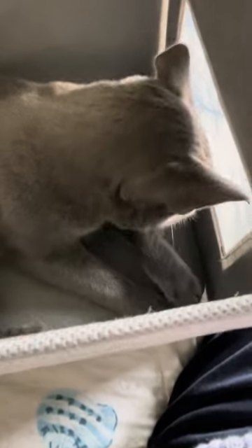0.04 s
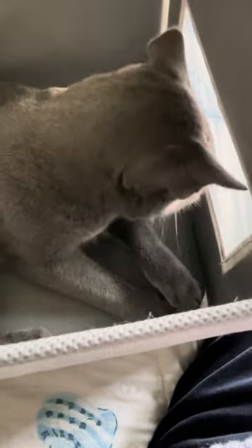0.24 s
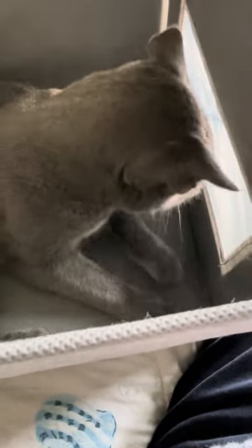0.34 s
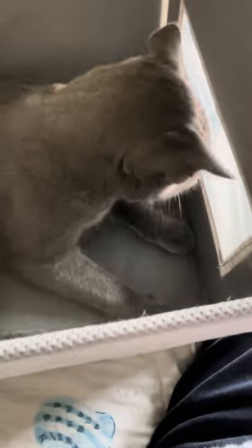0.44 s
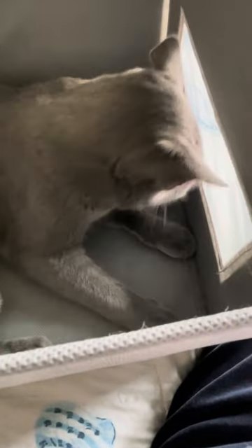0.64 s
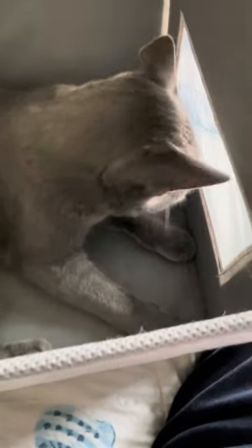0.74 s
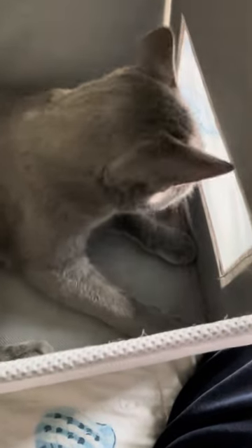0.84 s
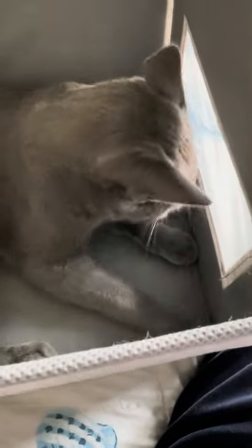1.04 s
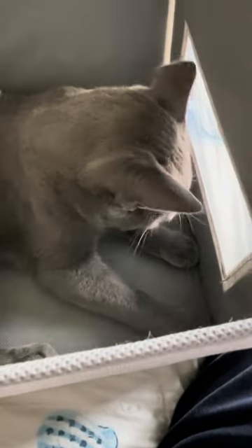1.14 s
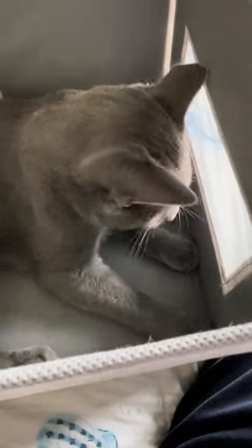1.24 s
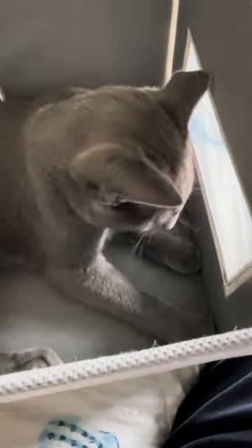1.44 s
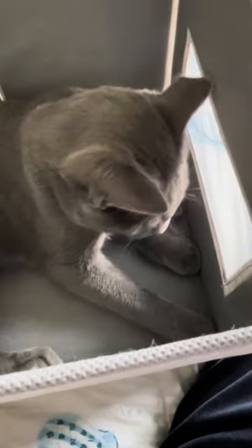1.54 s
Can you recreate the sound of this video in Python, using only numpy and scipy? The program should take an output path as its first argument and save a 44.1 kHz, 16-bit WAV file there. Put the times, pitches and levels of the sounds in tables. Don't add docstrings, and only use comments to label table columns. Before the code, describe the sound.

One dull boxy paw thump on card, followed by light claw ticks and faint brushing

```python
import sys
import numpy as np
from scipy import signal
from scipy.fft import rfft, irfft
from scipy.io import wavfile
from scipy.ndimage import uniform_filter1d

SR = 44100
rng = np.random.default_rng(int(sys.argv[2]) if len(sys.argv) > 2 else 0)


def store_wav(level_fs):
    pcm = np.round(np.clip(np.atleast_2d(level_fs), -1, 1) * 32767)
    wavfile.write(sys.argv[1], SR, pcm.T.astype(np.int16))


def boost(x):
    u = np.asarray(x, float) / 20
    return 10 ** u


N = 70560
HZ = np.fft.rfftfreq(N, 1 / SR)
TIME = np.arange(N) / SR
TICK_LAG = .6


def evened(x):
    return x / np.sqrt(np.mean(x ** 2) + 1e-20)


def read(points, hz):
    f, value = np.transpose(points)
    return np.interp(np.log(hz + 1), np.log(f + 1), value)


def bump(hz, width):
    return np.exp(-((HZ - hz) / (width / 1.23)) ** 2)


def resonances(table):
    return sum(boost(db) * bump(hz, width) for hz, width, db in table)


def coloured(x, gain):
    return irfft(rfft(x) * gain, N)


def noise():
    return rng.standard_normal(N)


def impulse(s):
    return 1. * (np.arange(N) == round(s * SR))


def swell(s, spread):
    return np.exp(-.5 * ((TIME - s) / spread) ** 2)


def sliding(from_hz, to_hz, db, s, spread):
    hz = np.interp(TIME, [s - spread * 1.5, s + spread], [from_hz, to_hz])
    waver = 1 + .4 * evened(uniform_filter1d(noise(), 500))
    return boost(db) * waver * np.sin(2 * np.pi * np.cumsum(hz) / SR) * swell(s, spread)


def bending(x, share=1):
    lag_s = share * .0235 * (np.maximum(HZ, 85) / 100) ** -.95
    return coloured(x, np.exp(-2j * np.pi * np.cumsum(lag_s) * SR / N))


def dull_top():
    return boost(-14 * (HZ > 13200))


def pair(mid, side):
    mid = coloured(mid, dull_top() * boost(-14 * bump(7600, 1300)))
    side = coloured(side, boost(-10 * bump(11000, 1500) - 8 * bump(5300, 400)))
    return np.array([mid + side, mid - side])


# f/Hz, width/Hz, level/dB
HUM_TONES = [
    (58.76, 13, -59),
    (118.8, 9.1, -64),
]


def hum():
    return sum(boost(db) * evened(coloured(noise(), bump(hz, width))) for hz, width, db in HUM_TONES)


def whine():
    return sliding(1548, 1548, -85, .08, .03)


# f/Hz, level/dB per Hz
AIR_MID_TONE = [(12, -48), (20, -1.5), (113, 5.5), (310, -24.5), (499, -34), (2200, -38.5), (2990, -44.5),
                (3340, -39.5), (16000, -51.5)]
# f/Hz, level/dB per Hz
AIR_SIDE_TONE = [(12, -9), (20, -13.5), (168, -0.5), (527, -14.5), (1060, -16), (1570, -23.5),
                 (5230, -30.5), (7110, -35), (16000, -46)]
# t/s, level/dB
RUMBLE_SWELL = [(0, -4), (.045, -3.5), (.095, -5.5), (.2, 1.5), (.45, 4.5), (.72, -2), (.755, -10),
                (.8, -2.5), (1, -2), (1.27, 4.5), (1.31, -18.5), (1.35, -2), (1.585, 1.5), (1.6, 4)]


def air():
    mid = boost(-61.5) * evened(coloured(noise(), boost(read(AIR_MID_TONE, HZ))))
    side = boost(-74.5) * evened(coloured(noise(), boost(read(AIR_SIDE_TONE, HZ))))
    low = coloured(mid, bump(0, 300))
    rumble = (low + hum()) * boost(np.interp(TIME, *np.transpose(RUMBLE_SWELL)))
    return pair(mid - low + rumble + whine(), side)


# f/Hz, level/dB, t/s, spread/s
WALL_PINGS = [(4550, -59, 1.063, .0009), (2300, -66, .2335, .0005), (660, -60, 1.528, .002),
              (560, -62, 1.545, .002), (1300, -68, 1.315, .0005), (2200, -50, .252, .0006),
              (1700, -52, .248, .0007), (215, -46.5, 1.3893, .005), (215, -41, .308, .009),
              (2200, -65, 1.528, .0008), (2400, -68, 1.479, .0006), (2350, -60, 1.326, .0008),
              (620, -66, 1.097, .004), (330, -56, 1.09, .005), (1150, -67, 1.13, .001),
              (1100, -68, 1.085, .0006), (1000, -66, 1.545, .001), (400, -62, 1.088, .003),
              (680, -61, 1.066, .002), (2200, -72, .786, .001), (2050, -74, .767, .001),
              (450, -63, 1.1, .003), (820, -66, 1.533, .0015), (400, -64, 1.56, .003),
              (1900, -64, 1.346, .0008)]


def pings():
    return sum(boost(db) * np.sin(2 * np.pi * hz * (TIME - s)) * swell(s, spread)
               for hz, db, s, spread in WALL_PINGS)


# f/Hz, width/Hz, level/dB
WALL_MODES = [(92, 30.7, -3), (112.5, 38, -1), (218.8, 51, -7.5), (287.7, 81.3, -7.5), (427, 57, -22),
              (700, 420, -30.5), (1198, 250, -30), (2096, 820, -30), (3680, 360, -41.5), (4820, 1200, -40),
              (6600, 1800, -48), (8850, 2160, -42), (12300, 1900, -64), (15200, 1200, -44)]


def thump():
    hit_s, crack_hz, crack_t60 = .2407, 5600, .006
    flap_hz, flap_width, flap_s = 225, 70, .002
    gain = resonances(WALL_MODES)
    gain = gain * np.exp(-2j * np.pi * HZ * .0033 * (HZ < 165))
    flap_lag = flap_s * np.cumsum(bump(flap_hz, flap_width)[::-1])[::-1]
    gain = gain * np.exp(2j * np.pi * flap_lag * SR / N)
    after = TIME - hit_s
    crack = noise() * (after >= 0) * boost(-60 * np.clip(after, 0, 1) / crack_t60)
    crack = crack / np.linalg.norm(crack)
    high = 1 / (1 + (crack_hz / (HZ + 1)) ** 8)
    blow = coloured(impulse(hit_s), gain * (1 - high))
    wave = bending(blow + coloured(crack, gain * high))
    wave = wave * np.clip(after / .001, 0, 1)
    return -boost(-17) * wave / abs(wave).max()


# f/Hz, phase/rad
PORT_LEAD = [(300, 0), (650, 1.2), (1400, -.1), (2500, .4), (3200, 1.5), (4600, -.1), (7500, 3),
             (11200, 6.3), (16000, 10.6)]
# f/Hz, level/dB
PORT_LEVEL = [(200, -.5), (450, 0), (700, -5), (1250, -10), (2000, -1), (3200, -1), (4500, -7), (5600, -1),
              (14000, -1)]


def ports(x):
    phase = np.interp(HZ, *np.transpose(PORT_LEAD))
    half = np.exp(.5j * phase) * boost(read(PORT_LEVEL, HZ) / 2)
    return np.array([coloured(x, half), coloured(x, 1 / half)])


# f/Hz, t60/s
RING_T60 = [(70, .3), (120, 0.36), (250, 0.27), (600, 0.19), (1500, 0.22), (4000, 0.26), (10000, 0.3)]
# f/Hz, level/dB
RING_COLOUR = [(60, -2.5), (120, 1.5), (200, 6.5), (280, 2), (560, 12.5), (2000, -4), (4000, 4),
               (10000, -8.5), (13000, 9), (14500, -15)]
# f/Hz, level/dB
RING_WIDTH = [(60, -31.5), (200, -30), (380, -11), (700, 1), (2400, 2.5), (4400, -3), (9000, -0.5),
              (10500, -26), (13300, -29), (14500, 2), (15600, -15)]


def ring(x):
    hz, t, z = signal.stft(rng.standard_normal((2, SR)), SR, nperseg=256)
    z = z * boost(read(RING_COLOUR, hz)[:, None] - 60 * t / read(RING_T60, hz)[:, None])
    flutter = boost(7.5 - 60 * t / .079)
    z = z * (1 + flutter * (hz > 1200)[:, None])
    width = np.array([1 + 0 * hz, boost(read(RING_WIDTH, hz))])
    tail = signal.istft(z * width[:, :, None], SR, nperseg=256)[1]
    tail = tail * np.clip((np.arange(tail.shape[1]) / SR - .003) / .0014, 0, 1)
    tail = tail / np.linalg.norm(tail[0])
    return pair(*signal.fftconvolve(x[None], tail, axes=1)[:, :N])


# t/s, level/dB
BODY_KNOCKS = [
    (0.359, -37),
    (.715, -55),
]


def jolts():
    drive = sum(boost(db) * impulse(s) for s, db in BODY_KNOCKS)
    gain = bump(250, 710) + .039 * bump(2500, 5000)
    side = bending(coloured(drive, gain / gain.mean()), TICK_LAG)
    return np.array([side, -side])


# t/s, peak level/dB, thud level/dB, knock level/dB, snap level/dB
CLAW_TICKS = [(0.361, -63, -29, -20, -33), (0.402, -72.5, 8, -47.5, -29), (0.772, -59.5, -28.5, -32, -31),
              (0.854, -75.5, -18, -18, -2), (1.062, -61, -17, -2.5, -46), (1.084, -62.5, -18, -16, -14.5),
              (1.147, -56, -31, -22, -12.5), (1.158, -65.5, -17, -16, -6), (1.18, -67, 2, -10.5, -1),
              (1.19, -67.5, 4, -3.5, -9), (1.196, -84.5, -5, -19, -8), (1.233, -65, -27, -7, -36),
              (1.239, -86, -18, -4, -36), (1.225, -48.5, -5, -15.5, -12), (1.325, -58.5, -5, 5, -26),
              (1.336, -69, 7, 13.5, -50), (1.3832, -48.5, -3, -3.5, -22.5), (1.391, -46.5, 2, -40, -21.5),
              (1.398, -51.5, -2, -14, -15.5), (1.4792, -65.5, -7, -22, -16.5),
              (1.527, -63.5, -11, -25, -29.5), (1.553, -69, -19, 2, -13), (1.559, -68, -4, 0, -8)]
# f/Hz, width/Hz, level/dB
TICK_PARTS = [
    (280, 260, 17),
    (920, 650, 20),
    (9900, 6000, 25),
    (3200, 4500, 12),
]


def ticks():
    size, t60 = 300, .005
    t = np.arange(size) / SR
    bursts = rng.standard_normal((len(CLAW_TICKS), size)) * boost(-60 * t / t60)
    out = np.zeros(N)
    for k, (hz, width, part_db) in enumerate(TICK_PARTS):
        drive = np.zeros(N)
        for (s, peak_db, *own_db), burst in zip(CLAW_TICKS, bursts):
            at = round(s * SR)
            db = peak_db + (own_db[k] if k < 3 else 0)
            strike = burst / np.linalg.norm(burst) if k > 1 else t == 0
            drive[at:at + size] += boost(db) * strike
        out += boost(part_db) * coloured(drive, evened(bump(hz, width)))
    return bending(coloured(out, dull_top()), TICK_LAG)


# f/Hz, level/dB per Hz
RUB_MID_TONE = [(88, -32), (150, -1), (524, -33), (675, -25), (2020, -26.5), (6020, -32), (7180, -30),
                (10200, -37.5), (16000, -55.5)]
# f/Hz, level/dB per Hz
RUB_SIDE_TONE = [(88, -31), (150, 17.5), (1720, -15.5), (2650, -13), (5360, -21.5), (8730, -13.5),
                 (11000, -44), (13200, -37.5), (16000, -33)]
# middle t/s, spread/s, level/dB, low rub level/dB, fur hiss against level/dB
PAW_STROKES = [(0.397, 0.0077, -84, -67.5, -13), (0.419, 0.013, -75.5, -52.5, 2.5),
               (0.57, 0.064, -95, -75, 1.5), (0.673, 0.03, -79.5, -67.5, 4.5),
               (0.751, 0.011, -81.5, -73.5, -25), (0.781, 0.011, -73, -70, -14),
               (0.82, 0.014, -75.5, -70, -17.5), (0.872, 0.017, -91, -72.5, -5),
               (0.962, 0.03, -90, -65, 2.5), (1.091, 0.016, -76, -56, 2), (1.157, 0.013, -79.5, -64.5, 7.5),
               (1.192, 0.0088, -76.5, -67, 7), (1.219, 0.0071, -72.5, -65, 2.5),
               (1.235, 0.007, -65.5, -58.5, -4), (1.34, 0.012, -72, -54.5, -1),
               (1.406, 0.017, -74.5, -52.5, -0.5), (1.492, 0.014, -81.5, -59, 5),
               (1.534, .007, -75, -67, 1), (1.562, 0.011, -73.5, -68, -0.5)]
# f/Hz, width/Hz, level/dB
WALL_FLEX = [
    (71, 40.6, 9),
    (204.5, 123, 2.5),
    (395, 81, -10.5),
]


def rub_tone(points):
    gain = boost(read(points, HZ) + 7 * bump(2200, 1000)) * (HZ > 400)
    band = (HZ > 1000) & (HZ < 6000)
    return gain / np.sqrt(np.mean((gain * band) ** 2))


def brush():
    rest_db, grains_per_s, grain_db, fur_hz = -96, 2000, 1.5, 7600
    flicker = boost(1.6 * evened(uniform_filter1d(noise(), 400)))
    size = boost(grain_db * np.minimum(rng.exponential(1, (2, N)), 3))
    size = size * (rng.random((2, N)) < grains_per_s / SR)
    grains = (size + .5) * rng.standard_normal((2, N))
    level, hiss, low = boost(rest_db), boost(rest_db), 0
    for s, spread, db, low_db, fur_db in PAW_STROKES:
        stroke = swell(s, spread)
        level = level + boost(db) * stroke
        hiss = hiss + boost(db + fur_db) * stroke
        low = low + boost(low_db) * stroke
    flex = low * evened(coloured(noise(), resonances(WALL_FLEX)))
    rubs = []
    for grain, points in zip(grains, (RUB_MID_TONE, RUB_SIDE_TONE)):
        grain, tone = flicker * evened(grain), rub_tone(points)
        pads = coloured(level * grain, tone * (HZ < fur_hz))
        fur = coloured(hiss * grain, tone * (HZ >= fur_hz))
        rubs.append(pads + fur)
    return pair(flex + rubs[0], boost(-2.5) * rubs[1])


# from f/Hz, to f/Hz, level/dB, t/s, spread/s
CARD_CREAKS = [
    (560, 530, -75, .78, .007),
    (505, 465, -73, .832, .02),
]


def creaks():
    return pair(sum(sliding(*row) for row in CARD_CREAKS), np.zeros(N))


def scene():
    blow = thump()
    claws = ticks() + pings()
    tail = ring(boost(-12.5) * blow + boost(-16) * claws)
    return air() + ports(blow + claws) + tail + jolts() + brush() + creaks()


def band_limit(x):
    return signal.sosfilt(signal.butter(12, 16800, fs=SR, output="sos"), x)


def record(dry):
    return band_limit(dry)


dry = scene()
out = record(dry)
store_wav(out)
```